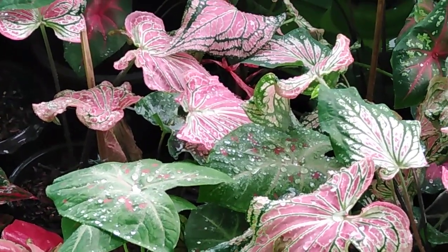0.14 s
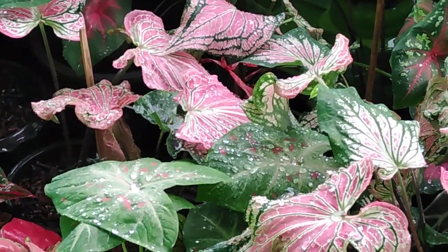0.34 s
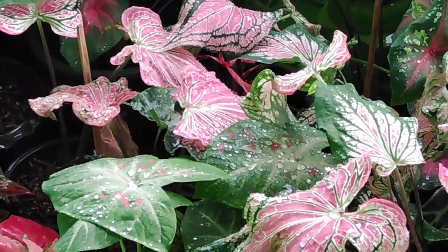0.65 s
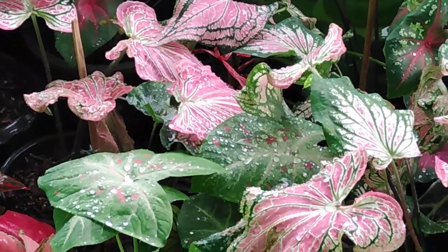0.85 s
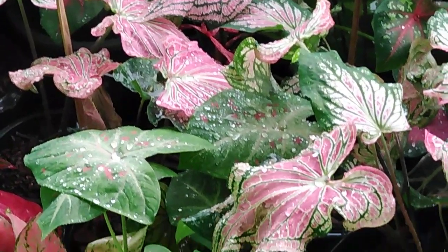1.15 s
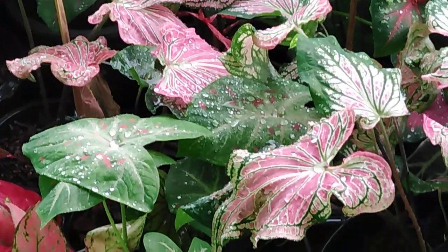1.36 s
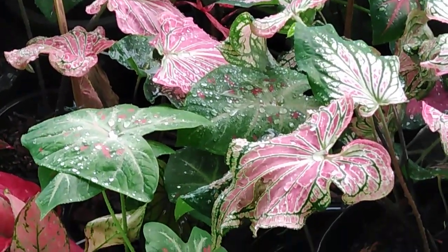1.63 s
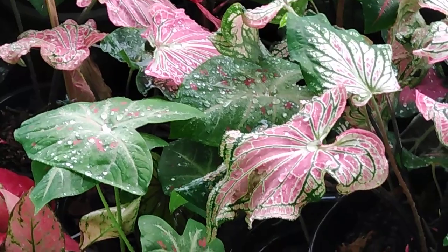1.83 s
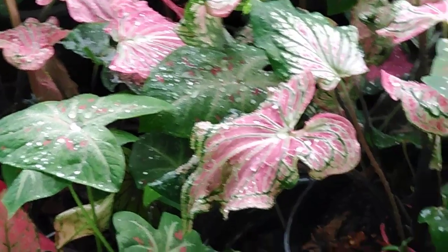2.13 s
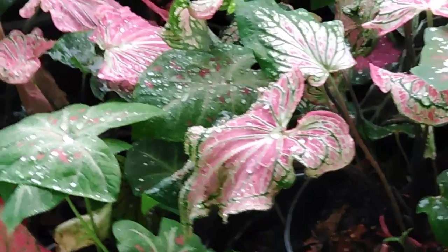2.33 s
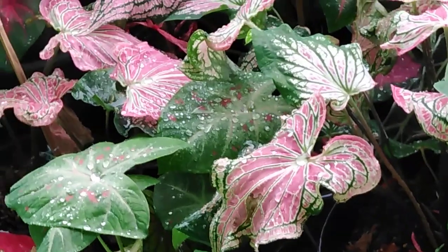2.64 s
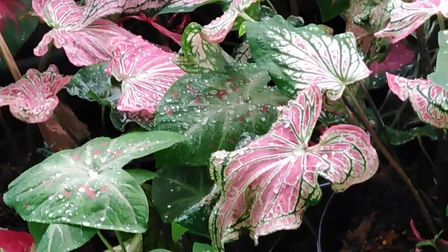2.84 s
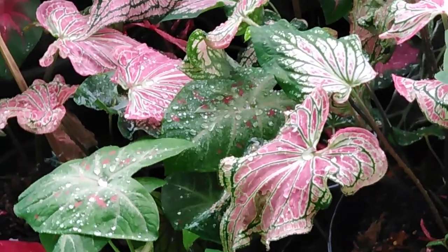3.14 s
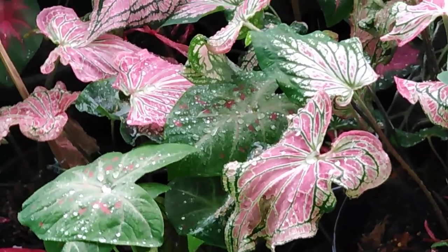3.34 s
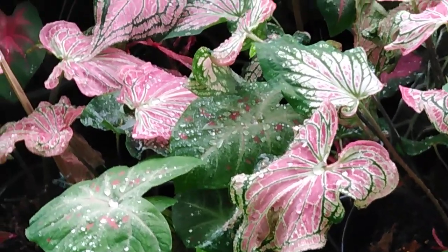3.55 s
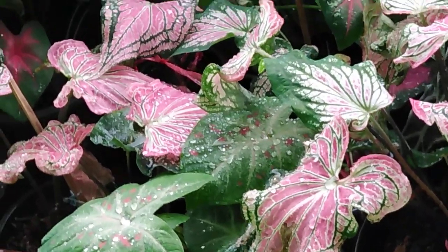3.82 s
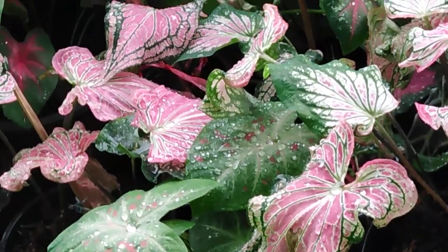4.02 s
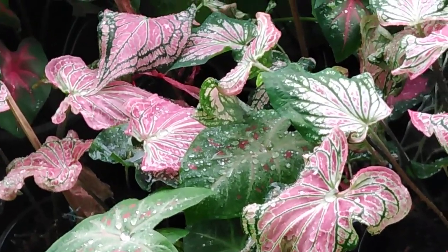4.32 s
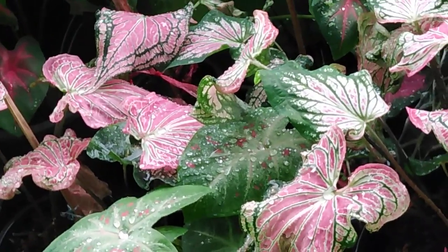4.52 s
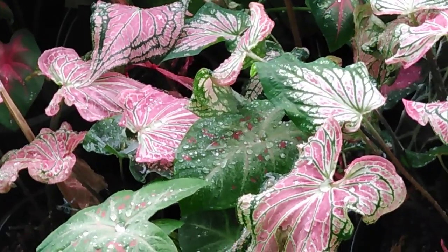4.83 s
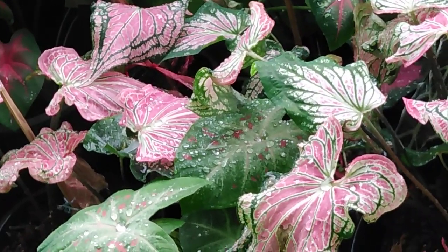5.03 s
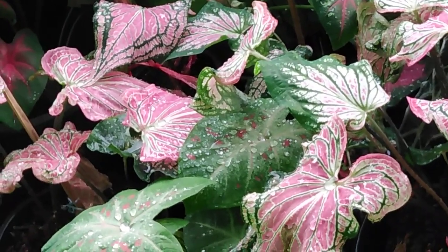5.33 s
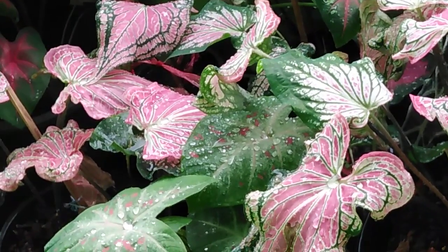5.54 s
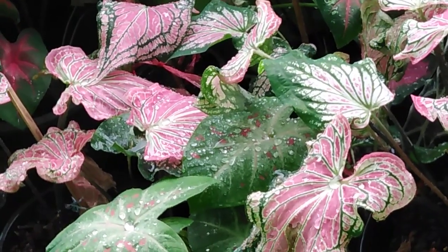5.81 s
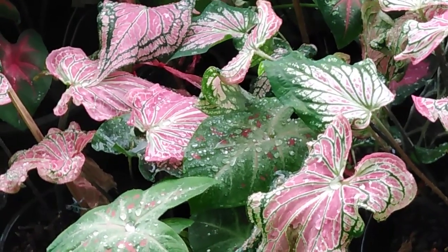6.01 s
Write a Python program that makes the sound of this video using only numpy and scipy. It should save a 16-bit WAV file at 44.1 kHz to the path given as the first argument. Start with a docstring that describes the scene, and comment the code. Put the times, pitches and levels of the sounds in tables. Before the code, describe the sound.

Close outdoor dripping among wet potted plants. Heavy drops thud softly on leaves at varied pitches, many to the right, while small glassy plinks and sharp clicks lean left. The sharpest tick comes just after one second; a sparser middle follows, then louder, denser leaf taps and plinks in the last second. Quiet patter and soft steady air noise continue underneath.

```python
"""Heavy rainwater drops tap broad-leaved potted plants close to the microphone: damped tones with a wet slap.
Small drops plink in standing water as narrow resonances; others tick on hard edges or burst into noisy spray.
Soft low bumps and weaker, farther drips join in.
Behind them lie a faint patter that swells briefly after each tap, plink and burst, and the steady garden hush."""
import sys
import numpy as np
from scipy import signal
from scipy.fft import rfft, irfft, next_fast_len
from scipy.io import wavfile
from scipy.ndimage import uniform_filter1d, map_coordinates

SR = 44100
rng = np.random.default_rng(int(sys.argv[2]) if len(sys.argv) > 2 else 0)


def wav_out(sig):
    """Save sig, one row per channel (or a flat mono array), as 16-bit PCM at SR to the path in sys.argv[1]."""
    wavfile.write(sys.argv[1], SR, np.round(np.clip(np.atleast_2d(sig).T, -1, 1) * 32767).astype(np.int16))


N = 272097
PORT_LAG_S = 0.00045  # the left port hears the drops this much after the right

# Heavy drops on broad leaves. Each row: start in seconds, leaf pitch in Hz, level in dB before trim,
# after-ring in dB re that level before trim, left minus right in dB.
LEAF_TAPS = [(0.099, 307, -44.5, -25, -7), (0.623, 505, -45, -15.5, 17), (0.687, 700, -42.5, -21, -17),
             (0.977, 738, -36, -15, -32), (1.095, 640, -42, -16.5, -25), (1.191, 934, -48, -21, -21),
             (1.527, 746, -53, -28, -9), (1.568, 1342, -42.5, -11.5, 19), (1.57, 765, -36.5, -12.5, -26),
             (1.58, 458, -40, -14.5, 15), (1.675, 1050, -53.5, -34, 27), (1.736, 1620, -50, -23, -10),
             (2.033, 440, -35, -10.5, 3.5), (2.035, 1010, -51, -9, 16), (2.074, 690, -38, -10, -15),
             (2.388, 482, -41.5, -27, 49), (2.63, 544, -36.5, -13.5, 7), (3.117, 1120, -44, -18, 1.5),
             (3.141, 362, -52, -16, -2), (3.184, 740, -45.5, -26, -18), (3.246, 1385, -48.5, -29, 18),
             (3.449, 290, -47, -26, 5), (3.468, 945, -39.5, -36, -27), (3.6, 1025, -33, -20.5, 6),
             (3.64, 1836, -50, -15, -16), (3.696, 1850, -48, -22, -21), (3.748, 696, -37, -17.5, -12),
             (4.098, 677, -38, -15.5, -26), (4.197, 478, -41, -11.5, 11), (4.202, 783, -38, -24.5, -3),
             (4.247, 297, -48.5, -16, -2), (4.258, 1020, -48, -24, -10), (4.32, 687, -29.5, -17, -11),
             (4.631, 977, -39, -23, -12), (4.723, 1304, -50.5, -26, -13), (4.828, 488, -41, -10.5, 19),
             (4.901, 725, -33, -12, -18), (4.944, 1050, -45.5, -14, 8), (4.979, 284, -46, -12.5, -6),
             (5.047, 632, -43.5, -9, -17), (5.054, 326, -53, -3, 1), (5.081, 610, -37, -11, -17),
             (5.316, 1090, -47.5, -13.5, 20), (5.473, 647, -38, -10, -20), (5.498, 741, -35.5, -18, -1),
             (5.688, 925, -32, -14.5, 5), (5.717, 540, -33.5, -3.5, -10), (5.733, 613, -30.5, -13.5, -18),
             (6.048, 603, -38.5, -13.5, -17), (6.105, 408, -45.5, -8.5, -1), (6.12, 667, -32, -9.5, -13)]


def leaf_taps():
    """A heavy drop sets a broad leaf ringing as a heavily damped resonance."""
    return ringing(LEAF_TAPS, rise_s=0.00701, width_hz=85, t60_s=0.21, ring_trim_db=8,
                   wet_db=-9, wet_t60_s=0.058, trim_db=0.5)


# Wet impact. Each row: frequency in Hz, relative level in dB.
SLAP_SPECTRUM = [(60, -28), (250, -30), (500, 9), (1100, 0.5), (2500, -12.5), (3700, -14.5), (7500, -7),
                 (13000, -58)]


def ringing(rows, rise_s, width_hz, t60_s, wet_db, wet_t60_s, ring_trim_db=0, trim_db=0):
    """Each drop drives one damped resonance; surrounding leaves scatter it into a fluttering after-ring."""
    out, t = np.zeros((2, N)), port_times(SR // 4)
    for start_s, hz, db, after_db, pan_db in rows:
        gain = amp(db + trim_db)
        tone = swell(t, rise_s) ** 2 * np.sin(2 * np.pi * hz * t + rng.uniform(0, 2 * np.pi))

        half_width_hz = width_hz + 0.012 * hz
        band = lambda f: 1 / (1 + np.abs((f - hz) / half_width_hz) ** 3)
        scatter = unit(filtered(at_ports(rng.standard_normal((3, t.shape[1]))), band))
        ring_onset = 1 - np.exp(-(t / (2 * rise_s)) ** 4)
        ring = amp(after_db + ring_trim_db - 60 * t / t60_s) * ring_onset * scatter

        # a faint narrow-band noise swell leads into each tone
        lead_in = amp(-20) * swell(t, rise_s) * scatter

        # the water itself breaks up with a dull, grainy slap
        slap = coloured(droplets(t.shape[1], per_second=2500), SLAP_SPECTRUM)
        slap *= amp(wet_db - 60 * t / wet_t60_s) * (1 - np.exp(-(t / rise_s) ** 2))

        add(out, start_s - rise_s, gain * lead_in, pan_db)
        add(out, start_s, gain * (tone + ring), pan_db)
        add(out, start_s, gain * slap, pan_db / 4)
    return out


# Drops into standing water. Each row: start in seconds, pool name, level in dB before trim.
PLINKS = [(0.065, "ahead", -58), (0.248, "busy", -38.5), (0.302, "busy", -50.5), (0.651, "busy", -42),
          (0.719, "busy", -46), (0.865, "keen", -38), (0.997, "thin", -46), (1.176, "tiny", -46),
          (1.183, "busy", -40), (1.277, "hollow", -41), (1.279, "round", -57), (1.288, "deepest", -48.5),
          (1.446, "busy", -51), (2.126, "thin", -37.5), (2.154, "busy", -30), (2.189, "deep", -50),
          (2.196, "busy", -31), (2.624, "round", -49), (2.935, "bright", -53.5), (3.402, "busy", -41.5),
          (3.683, "keen", -53), (3.688, "mellow", -46), (4.034, "hollow", -49), (4.036, "round", -43),
          (4.037, "clear", -47), (4.067, "bright", -42.5), (4.079, "bright", -35.5), (4.081, "ahead", -43),
          (4.198, "deepest", -44), (4.26, "mellow", -49.5), (5.007, "deep", -50), (5.072, "clear", -44),
          (5.075, "deep", -40), (5.201, "ahead", -47), (5.218, "round", -30.5), (5.231, "full", -49),
          (5.232, "bright", -41.5), (5.259, "round", -36.5), (5.272, "full", -43.5), (5.327, "bright", -48),
          (5.373, "round", -47), (5.509, "round", -47.5), (5.537, "clear", -43.5), (5.687, "ahead", -42.5),
          (5.953, "thin", -49), (6.041, "deep", -46.5), (6.05, "clear", -49), (6.049, "bright", -42.5),
          (6.119, "ahead", -45), (6.164, "deep", -46.5)]
# Pools under the drip points, each with its own bubble, by name. Each entry: pitch in Hz,
# after-ring in dB re the plink before trim, left minus right in dB.
POOLS = {"deepest": (2356, -22, 30), "deep": (2690, -17.5, 35), "round": (3090, -19.5, 20),
         "full": (3400, -13.5, 6), "hollow": (3980, -21, 23), "mellow": (4450, -27, 22),
         "clear": (5170, -23, -2), "keen": (6060, -13, -25), "bright": (6760, -19, -37),
         "ahead": (7235, -16, -2.6), "busy": (8170, -23, 22), "thin": (10450, -22.5, 21),
         "tiny": (12190, -21, -5)}


def pool_plinks():
    """A drop in standing water rings a narrow bubble resonance; the pool sets pitch, after-ring and side."""
    rows = []
    for start_s, pool, db in PLINKS:
        hz, after_db, pan_db = POOLS[pool]
        rows.append((start_s, hz, db, after_db, pan_db))
    return ringing(rows, rise_s=0.0054, width_hz=24, t60_s=0.26, ring_trim_db=11,
                   wet_db=-18, wet_t60_s=0.04, trim_db=-1)


# Drops on hard edges. Each row: start in seconds, pitch in Hz, level in dB before trim and high-pass,
# left minus right in dB.
EDGE_TICKS = [(0.2459, 11700, -33, 17), (0.8626, 7190, -15, -3), (0.8703, 7400, -14, 3),
              (1.1859, 9880, -30, 19), (1.2744, 8110, -24, 34), (1.2828, 7530, -2.5, 32),
              (2.131, 8450, -21, 26), (2.2006, 8150, -30, 24), (2.9632, 12580, -44, 11),
              (4.6247, 10420, -41, 12), (4.868, 11830, -18, 2), (4.8744, 10470, -18, 13),
              (5.4758, 12610, -29, 4), (5.483, 11510, -25, 15)]


def edge_ticks(echo_db=-29.5, echo_t60_s=0.16, flurry_db=-18, flurry_rise_s=0.0016):
    """A hard contact rings for a few cycles in a short flurry of fragments, then leaves a rustle of echoes."""
    out, t = np.zeros((2, N)), port_times(SR // 10)
    for start_s, hz, db, pan_db in EDGE_TICKS:
        click = swell(t, 0.00035) * np.sin(2 * np.pi * hz * t)
        spectrum = [(hz / 2, -42), (hz * 0.63, -16), (hz, 0), (hz * 1.33, -12), (hz * 2, -25)]
        fragments = coloured(droplets(t.shape[1], per_second=11000), spectrum)
        echo_level = amp(echo_db - 60 * t / echo_t60_s) * (1 - np.exp(-t / flurry_rise_s))
        flurry_level = amp(flurry_db) * swell(t, flurry_rise_s)
        add(out, start_s, amp(db) * click, pan_db)
        add(out, start_s - flurry_rise_s, amp(db) * (echo_level + flurry_level) * fragments, pan_db)
    # the ticks carry hardly any low sound
    return filtered(out, lambda hz: amp(-1.5) * hz ** 8 / (hz ** 8 + 4500 ** 8))


# Drops that burst into spray. Each row: time in seconds (spray starts lead_s earlier), level in dB,
# t60 in seconds before the linger fade, mist in dB re droplets, left minus right in dB.
BURSTS = [(0.061, -48, 0.27, -6, 22), (0.232, -44, 0.25, 3.5, 14), (0.366, -59.5, 0.24, -6, 21),
          (0.443, -55.5, 0.11, -13, 15), (0.612, -55, 0.22, -2, 13), (0.647, -54, 0.082, -1, 19),
          (0.683, -48, 0.19, -20, 27), (0.855, -30, 0.44, -26, 12), (1.168, -44, 0.35, 4.5, 16),
          (1.274, -32.5, 0.7, -13.5, 36), (1.399, -38, 0.16, 0, 14), (1.751, -46, 0.14, -12, 8),
          (1.952, -61, 0.21, 11, 3), (2.151, -52.5, 0.75, -2, 6), (2.511, -50.5, 0.23, -9.5, 1),
          (2.769, -55.5, 0.29, -3, 4), (2.91, -57.5, 0.27, -10, 4), (3.102, -53.5, 0.25, -14, 10),
          (3.358, -58, 0.78, -5, 0), (3.402, -55, 0.28, -14, 7), (3.682, -55, 0.12, -6, 6),
          (3.745, -48.5, 0.13, 7, 8), (4.031, -57, 0.47, -10, 3), (4.554, -53, 0.3, -8, -1),
          (4.862, -32, 0.33, 5.5, 5), (4.938, -44.5, 0.26, 9, 6), (5.198, -53, 0.96, -15, 3.5),
          (5.308, -43.5, 0.25, -12, 3), (5.375, -42.5, 0.1, -16, 24), (5.467, -45, 0.42, 6, 5.5),
          (5.679, -50.5, 0.17, -13, 7), (5.951, -52, 0.16, 3, 7)]
# Coarse spray. Each row: frequency in Hz, relative level in dB.
DROPLET_SPECTRUM = [(3500, -46), (4900, -25.5), (5600, -10), (6800, -8), (7600, 0.5), (8250, 4.5),
                    (8800, -13.5), (9600, -9), (12000, -85)]
# Fine spray. Each row: frequency in Hz, relative level in dB.
MIST_SPECTRUM = [(7500, -22.5), (9200, 1), (10200, 16), (11200, 0), (12200, 8), (13200, 0), (14200, 2),
                 (15000, -61)]


def splashes(rise_s=0.0049, clump_db=2, linger_s=0.17, lead_s=0.004):
    """A drop bursts into a dying shower of droplets and finer mist, which has all landed soon after."""
    out, t = np.zeros((2, N)), np.arange(SR // 3) / SR
    for time_s, db, t60_s, mist_db, pan_db in BURSTS + leaf_spray():
        coarse = coloured(droplets(len(t), per_second=7700), DROPLET_SPECTRUM)
        fine = coloured(droplets(len(t), per_second=2300), MIST_SPECTRUM)
        coarse, fine = spot_colour(np.array([coarse, fine]), depth_db=7, spacing_hz=130)
        spray = unit(unit(coarse) + amp(mist_db) * unit(fine))
        shape = (1 - np.exp(-(t / rise_s) ** 2)) * np.exp(-(t / linger_s) ** 2)
        level = amp(db - 60 * t / t60_s + clump_db * wobble(94, len(t)))
        add(out, time_s - lead_s, level * shape * spray, pan_db)
    return out


def leaf_spray(typical_spray_db=-64, db_per_tap_db=0.41, t60_s=0.5, mist_db=-7.5, pan_db=6):
    """Rows like BURSTS: every leaf tap throws a little spray, a heavy one more."""
    typical_tap_db = np.mean([row[2] for row in LEAF_TAPS])
    return [(start_s, typical_spray_db + db_per_tap_db * (db - typical_tap_db), t60_s, mist_db, pan_db)
            for start_s, _, db, _, _ in LEAF_TAPS]


def spot_colour(x, depth_db, spacing_hz):
    """Every landing spot favours its own few pitches."""
    gains_db = depth_db * rng.standard_normal(400)
    return unit(filtered(x, lambda hz: amp(np.interp(hz / spacing_hz, np.arange(len(gains_db)), gains_db))))


# Soft low bumps. Each row: start in seconds, pitch in Hz, level in dB before trim,
# after-ring in dB re that level before trim, left minus right in dB.
LOW_BUMPS = [(1.279, 189, -43.5, -14.5, 16), (1.425, 88, -48, -13, 14), (2.198, 122, -35, -9, 24)]


def low_bumps():
    """Soft bumps: slow-rising damped resonances at low pitch."""
    return ringing(LOW_BUMPS, rise_s=0.0108, width_hz=27, t60_s=0.23, ring_trim_db=8.5,
                   wet_db=-17, wet_t60_s=0.11, trim_db=-5.5)


def far_drips():
    """Weaker, shorter resonances at random moments: drips farther off, low taps and high plinks."""
    taps = far_rows(count=50, low_hz=226.4, high_hz=2472, level_db=-54, fall_db_per_octave=2.5)
    plinks = far_rows(count=50, low_hz=6630, high_hz=13150, level_db=-57, fall_db_per_octave=9)
    return ringing(np.vstack([taps, plinks]), rise_s=0.008, width_hz=41, t60_s=0.064,
                   wet_db=-4, wet_t60_s=0.037)


def far_rows(count, low_hz, high_hz, level_db, fall_db_per_octave):
    """Random rows for ringing(), weaker for each octave up."""
    when, pitch, size, side = rng.random((4, count))
    start_s = when * (N / SR - 0.05)
    hz = low_hz * (high_hz / low_hz) ** pitch
    db = level_db + 3 * (2 * size - 1) - fall_db_per_octave * np.log2(hz / low_hz)
    return np.transpose([start_s, hz, db, np.full(count, -12), 9 * (2 * side - 1)])


def spatter(per_second=14, level_db=-77):
    """Stray droplets land one by one as tiny crisp ticks."""
    spectrum = [(1200, -25), (2600, -16), (4000, -12), (8000, 1), (14000, -17)]
    return amp(level_db) * coloured(droplets(N, per_second), spectrum)


# Distant dripping. Each row: frequency in Hz, relative level in dB.
PATTER_SPECTRUM = [(88, -20), (150, -10), (216, -6.5), (362, 1), (491, -5), (720, -5), (823, -7),
                   (2060, -10.5), (3450, -14), (6750, -24), (7280, -13), (8010, -18), (11500, -44),
                   (13700, -45), (14500, -27.5)]


def patter(flutter_db=2):
    """Dense glittering grains of distant dripping, swelling briefly after each tap, plink and burst."""
    grains = patchy(droplets(N, per_second=2000), depth_db=3.5)
    level = amp(patter_level_db() + flutter_db * wobble(25, N))
    return level * lows_in_step(coloured(grains, PATTER_SPECTRUM))


def patter_level_db(calm_db=-73, swelling_db=-58, db_per_drop_db=0.25, rise_s=0.0013, t60_s=0.39):
    """The patter swells briefly after each tap, plink and burst; the swells add in power to a calm level."""
    power, t = np.full(N, amp(calm_db) ** 2), np.arange(SR // 2) / SR
    swelling = (1 - np.exp(-t / rise_s)) * amp(swelling_db - 60 * t / t60_s)
    taps = [(s, db) for s, _, db, _, _ in LEAF_TAPS]
    plinks = [(s, db) for s, _, db in PLINKS]
    bursts = [(s, db) for s, db, *_ in BURSTS]
    for drops, extra_db in ((taps, 0), (plinks, -4), (bursts, -0.5)):
        typical_db = np.mean([db for _, db in drops])
        for s, db in drops:
            start = round(s * SR)
            size = amp(extra_db + db_per_drop_db * (db - typical_db))
            power[start:start + len(t)] += (size * swelling[:N - start]) ** 2
    return 10 * np.log10(power)


def patchy(x, depth_db):
    """Small patches of random gain over time and frequency make the sound glitter."""
    z = signal.stft(x, nperseg=512)[2]
    field = uniform_filter1d(rng.standard_normal(z.shape[1:]), size=3, axis=0)
    field = uniform_filter1d(field, size=6, axis=1)
    return unit(signal.istft(z * amp(depth_db * unit(field)), nperseg=512)[1][:, :N])


# Outdoor hush. Each row: frequency in Hz, relative level in dB per Hz.
HUSH_SPECTRUM = [(15, -53), (25, -12), (297, 2), (549, -6), (796, -3.5), (1040, -11), (2310, -7.5),
                 (2860, -8.5), (3730, -22.5), (4870, -15.5), (7860, -8), (9470, -16), (10500, -18),
                 (13400, -30.5), (14500, -46)]
# Stereo likeness of the hush. Each row: frequency in Hz, left-right correlation from -1 to 1.
HUSH_LIKENESS = [(60, 0.99), (130, 1), (290, 1), (640, -0.29), (1400, -0.27), (3100, -0.018)]


def hush(level_db=-62):
    """Steady outdoor noise, nearly mono in the bass: correlation sets the mid-side balance."""
    angle = lambda hz: np.arccos(np.clip(along(HUSH_LIKENESS, hz), -1, 1)) / 2
    noise = coloured(rng.standard_normal((2, N)), HUSH_SPECTRUM)
    mid, side = filtered(noise, lambda hz: np.array([np.cos(angle(hz)), np.sin(angle(hz))]))
    return amp(level_db) * unit(np.array([mid + side, mid - side]))


def garden():
    """Hush and patter together, leaning slightly left."""
    return (hush() + patter()) * amp([[0.8], [-0.8]])


def droplets(n, per_second):
    """Stereo impulses at random moments and of random sizes, rms 1."""
    hit = rng.random((3, n)) < per_second / SR
    return at_ports(hit * rng.standard_normal((3, n)))


def at_ports(streams):
    """Three unrelated streams to stereo: one arrives directly at both ports, the others are scattered."""
    direct = np.array([np.roll(streams[2], round(PORT_LAG_S * SR)), streams[2]])
    return unit(direct + streams[:2])


def port_times(length):
    """Time since a sound reached the left and right ports; the right one hears it first."""
    return np.maximum(np.arange(length) / SR - np.array([[PORT_LAG_S], [-PORT_LAG_S]]) / 2, 0)


def lows_in_step(x, below_hz=827, share=0.72):
    """Low tones lose this share of the lag between channels; higher ones keep it."""
    lows = lambda hz: 1 / (1 + (hz / below_hz) ** 16)
    phase = lambda hz: np.pi * hz * PORT_LAG_S * share * lows(hz)
    return filtered(x, lambda hz: np.exp(1j * phase(hz) * np.array([[1], [-1]])))


def swell(t, rise_s):
    """A smooth push that peaks at 1 after rise_s and dies away."""
    return (t / rise_s * np.exp(1 - t / rise_s)) ** 2


def wobble(knots_per_second, n):
    """A smooth random curve of n samples."""
    knots = rng.standard_normal(4096)
    return map_coordinates(knots, [np.arange(n) * knots_per_second / SR], mode="wrap")


def add(track, start_s, sound, pan_db):
    """Mix a sound into the stereo track, leaning left (positive) or right at equal power."""
    start = max(round(start_s * SR), 0)
    part = (unit(amp([[pan_db / 2], [-pan_db / 2]])) * sound)[:, :N - start]
    track[:, start:start + part.shape[1]] += part


def coloured(x, spectrum):
    """x with its spectrum shaped by (Hz, dB) points, at rms 1."""
    return unit(filtered(x, lambda hz: amp(along(spectrum, hz))))


def filtered(x, response):
    """x times a response of frequency."""
    n = x.shape[-1]
    m = next_fast_len(n + 4096)
    return irfft(rfft(x, m) * response(np.fft.rfftfreq(m, 1 / SR)), m)[..., :n]


def along(points, hz):
    """(Hz, value) points read on a log axis."""
    f, v = np.transpose(points)
    return np.interp(np.log(hz + 1), np.log(f + 1), v)


def unit(x):
    """x at rms 1."""
    return x / np.sqrt(np.mean(x ** 2) + 1e-20)


def amp(db):
    """Decibels to gain."""
    return 10 ** (np.asarray(db) / 20)


def scene():
    """All the dripping in the garden."""
    lagged = leaf_taps() + low_bumps() + far_drips()
    return lows_in_step(lagged) + pool_plinks() + edge_ticks() + splashes() + spatter() + garden()


def record(dry):
    """The microphone drops the deepest bass and keeps almost nothing above its band limit."""
    low_cut = lambda hz: hz ** 3 / (hz ** 3 + 35 ** 3)
    band_limit = lambda hz: 1 / (1 + (hz / 14600) ** 120)
    return filtered(dry, lambda hz: low_cut(hz) * band_limit(hz))


dry = scene()
out = record(dry)
wav_out(out)
```